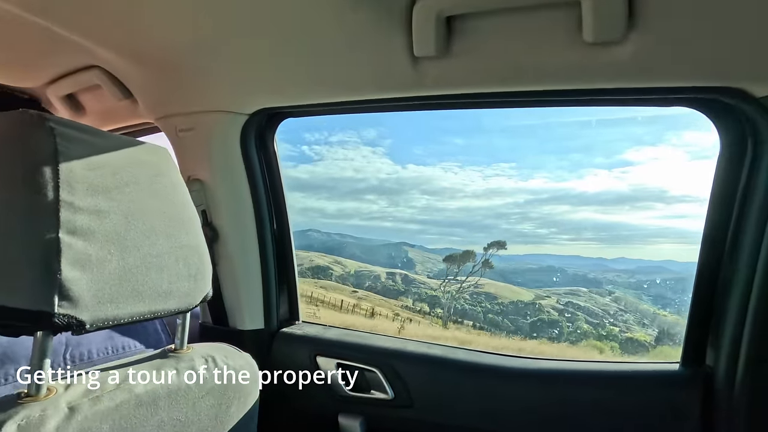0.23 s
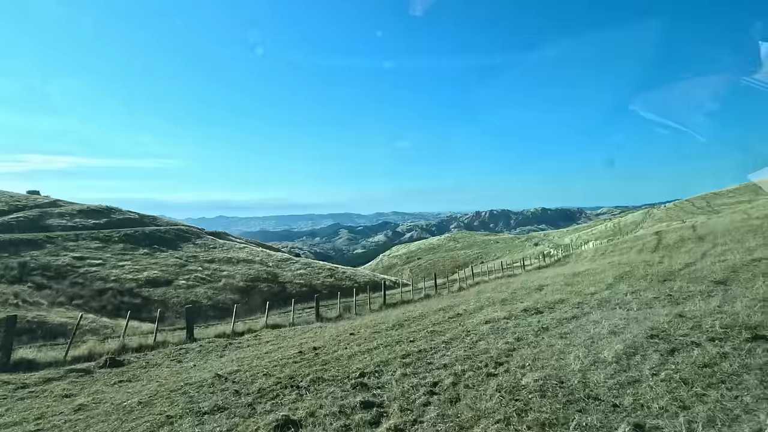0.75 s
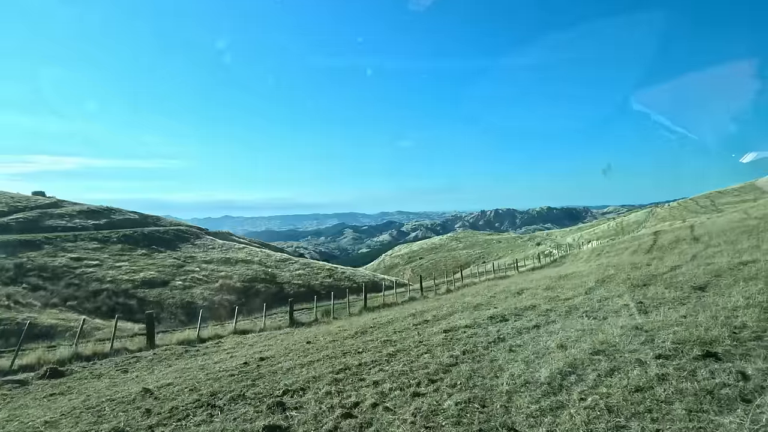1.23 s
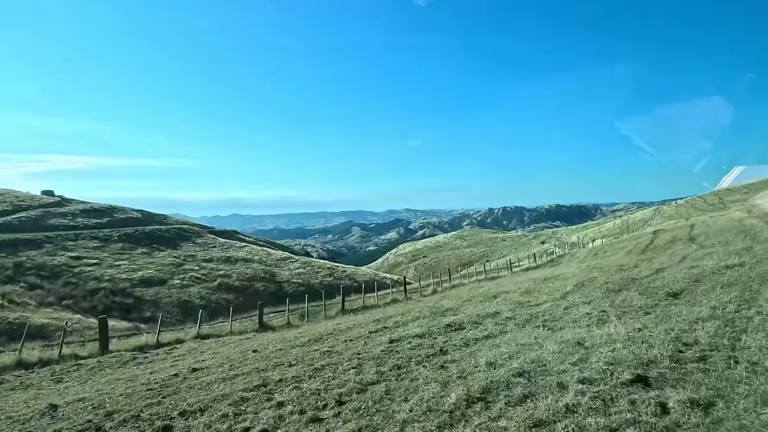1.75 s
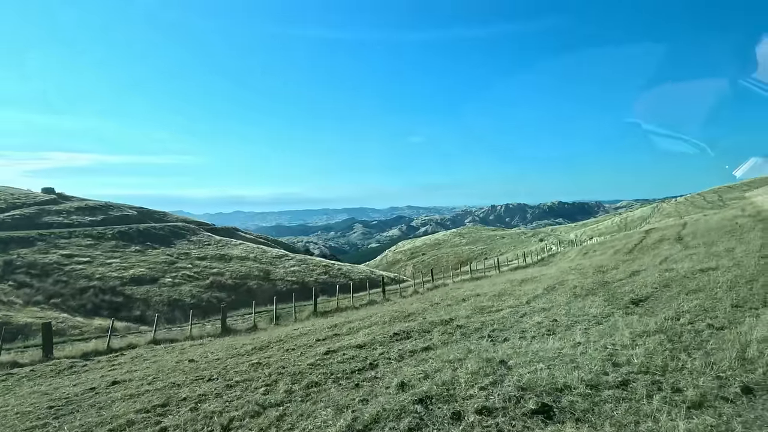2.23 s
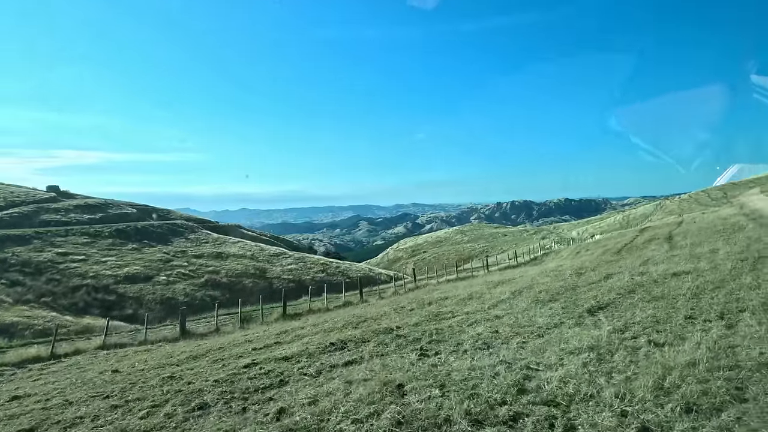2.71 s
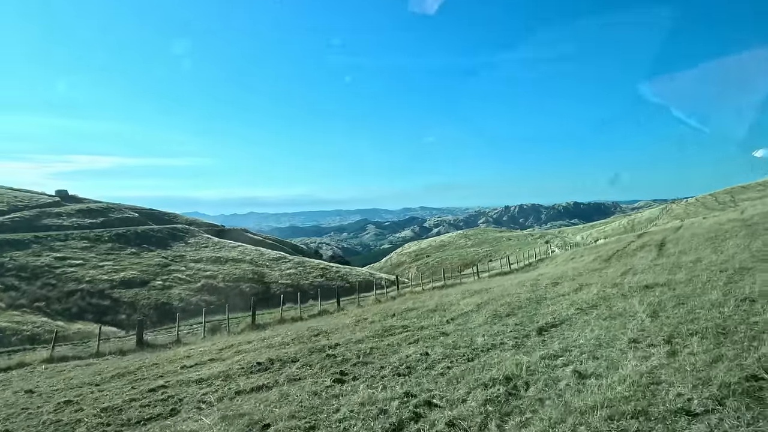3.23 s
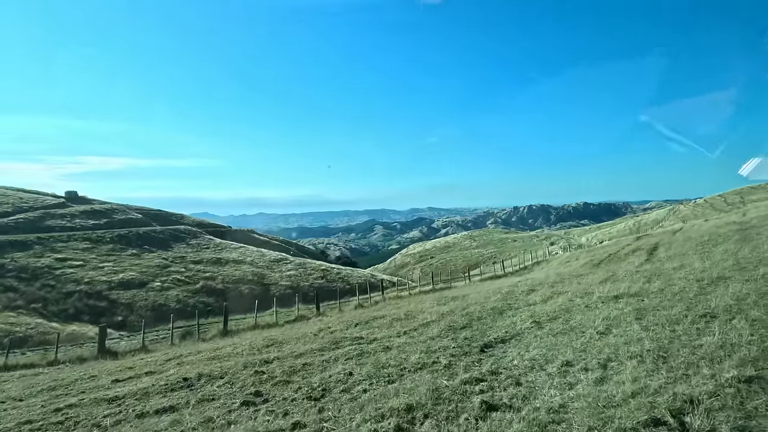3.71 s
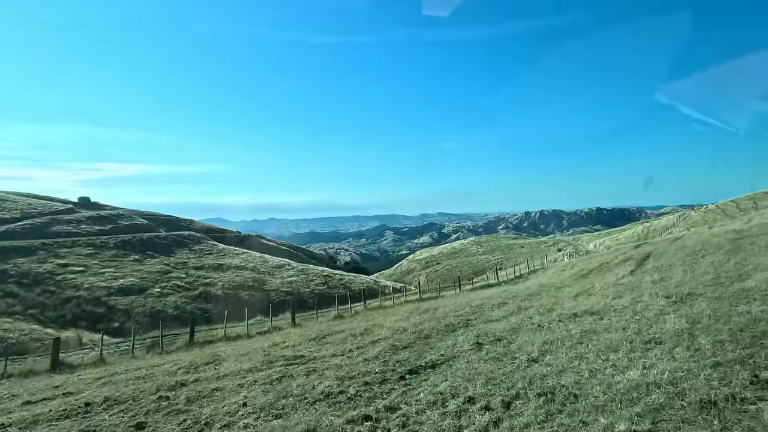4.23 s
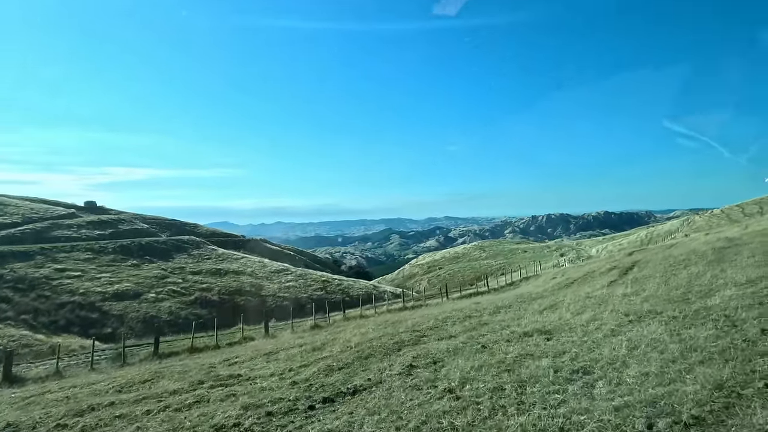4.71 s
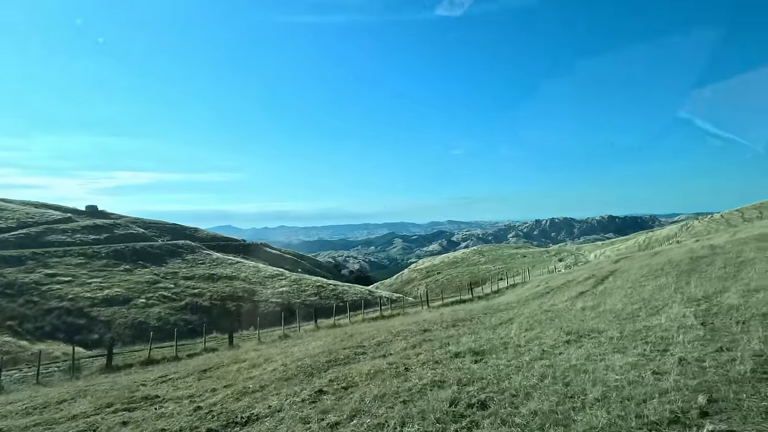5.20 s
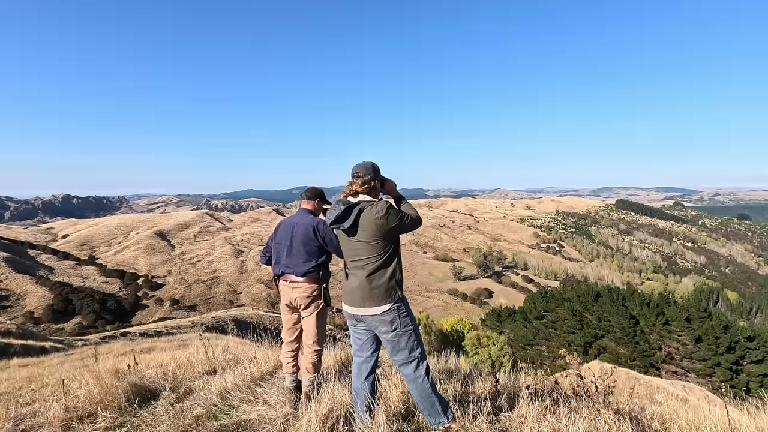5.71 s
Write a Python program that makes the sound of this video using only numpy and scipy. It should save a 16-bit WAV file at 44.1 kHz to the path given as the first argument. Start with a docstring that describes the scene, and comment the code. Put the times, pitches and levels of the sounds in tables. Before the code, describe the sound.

A deep, lumpy rumble of tyres and rocking bodywork fills a vehicle's cabin as it crosses grassy ground, the engine humming with small changes in speed. Scattered suspension thuds set off short knocks and rattles, with soft brushing and flicks of stems under the floor. The drive stops abruptly for a last half second outdoors: fading wind buffets on the microphone over a faint hiss of dry grass.

```python
"""A booming cabin and rumbling tyres, heard inside a four-cylinder utility vehicle on a rough paddock.
The rocking body pumps the cabin air; bumps thump the suspension and knock loose fittings; trim creaks.
The engine hums at multiples of crank speed, and dry grass brushes the underside.
At 5.46 s the scene changes to an open hilltop, where wind puffs on the microphone and dies down."""
import sys
import numpy as np
from scipy import signal
from scipy.fft import rfft, irfft, next_fast_len
from scipy.io import wavfile
from scipy.ndimage import uniform_filter1d, minimum_filter1d, map_coordinates

SR = 44100
rng = np.random.default_rng(int(sys.argv[2]) if len(sys.argv) > 2 else 0)


def store_wav(level_fs):
    """Save 16-bit WAV to argv[1]."""
    pcm = np.round(np.clip(np.atleast_2d(level_fs), -1, 1) * 32767)
    wavfile.write(sys.argv[1], SR, pcm.T.astype(np.int16))


N = 262826

# Boom of the rocking body: time_s, level_db
BOOM_LEVEL = [(0.05, -16.5), (1.13, -20), (1.21, -15), (1.85, -20), (2.24, -15), (2.46, -23), (2.59, -15),
              (3.22, -21), (3.46, -16), (3.64, -28.5), (3.77, -18), (4.4, -19.5), (4.61, -13),
              (4.71, -23.5), (5.01, -14.5), (5.16, -27.5), (5.34, -12), (5.45, -23.5)]
# Tussocks hitting the tyres: start_s, length_s, level_db, pitch_hz
TUSSOCK_HITS = [(0.07, 0.14, -25.5, 68), (0.116, 0.14, -16.5, 38), (0.225, 0.06, -29.5, 66),
                (.34, 0.11, -34, 116), (0.374, 0.13, -25, 70), (0.44, .14, -20, 44), (0.58, 0.15, -28, 68),
                (0.661, 0.083, -25, 78), (1.112, 0.088, -27.5, 55), (1.4, .1, -31, 47),
                (1.766, 0.058, -26, 60), (1.864, 0.092, -23.5, 62), (1.977, .1, -28.5, 66),
                (2.534, 0.074, -30.5, 72), (2.77, 0.14, -28, 62), (2.933, 0.11, -26, 62),
                (3.118, 0.12, -25.5, 64), (3.274, 0.075, -26.5, 62), (3.299, 0.082, -38, 150),
                (3.45, 0.12, -33.5, 100), (3.525, 0.15, -30, 54), (3.823, 0.12, -25.5, 64),
                (3.92, 0.15, -28.5, 66), (3.938, .1, -32.5, 108), (4.152, 0.12, -28, 58),
                (4.41, 0.14, -29.5, 55), (4.723, 0.12, -26.5, 58), (4.996, 0.1, -31, 100),
                (5.206, 0.11, -25, 60), (5.282, 0.078, -28.5, 104)]
# Suspension blows: start_s, level_db, pitch_ratio, bass_db, rebound_s, rebound_db
SUSPENSION_HITS = [(0.707, -25, 1, 8, 0.012, -26), (.948, -35, 1.22, -11, .02, -14),
                   (1.827, -28.5, 1.15, -3, 0.021, -9), (1.897, -16.5, 0.89, 2.5, .012, -4),
                   (2.009, -27.5, 1.07, -1, .017, -15), (2.802, -32.5, 0.99, -10, 0.0116, -16),
                   (2.868, -21, 0.96, -13, .011, -7.5), (3.603, -21, 0.98, -14, 0.019, -21),
                   (3.913, -21, 1.09, -12, .028, -5), (4.018, -20, 0.98, 0, 0.0121, -13),
                   (4.217, -34, .9, -6, 0.0135, -7), (5.244, -24, 1.11, -13, .03, -5),
                   (5.349, -20, 0.93, -3, .02, -13)]
# Loose fittings: start_s, level_db, pitch_ratio, chatter_s, chatter_db
FITTING_HITS = [(0.109, -41, 0.8, 0.022, -3.5), (0.312, -47.5, 0.88, 0.014, 1.5),
                (0.7073, -33, .8, 0.0054, -23), (1.8285, -30, 1.03, 0.016, -8),
                (1.898, -33.5, 1, 0.022, -2), (1.918, -40, 1.3, 0.011, -8), (2.07, -44.5, 1.4, 0.021, -2),
                (2.83, -41.5, 1, .025, 0), (2.873, -38, 1.2, 0.0083, -6), (2.884, -32.5, 1.09, 0.021, -4.5),
                (3.037, -32.5, 1, 0.014, -10), (3.7252, -22.5, 1.03, 0.034, -13.5),
                (4.019, -36.5, 1.1, 0.026, 0), (4.2, -43.5, 0.87, .012, 0), (4.432, -39, 1.1, 0.02, -6),
                (4.9997, -26, 1.02, 0.01, -13.5), (5.0225, -35.5, 1.13, 0.0078, -24),
                (5.349, -31, 0.83, 0.014, -6.5), (5.367, -38.5, 1.03, 0.0071, -8), (5.444, -44, 1, 0.02, 6)]
# Trim panel flurries: start_s, length_s, level_db
PANEL_FLURRIES = [(0.538, 0.015, -42), (0.617, 0.028, -40), (0.766, .005, -37)]
# Trim creaks: start_s, length_s, level_db, pitch_hz, rasp_hz
TRIM_CREAKS = [(3.163, 0.095, -61, 3160, 147), (3.415, 0.23, -65, 3520, 320), (3.903, 0.075, -64, 3440, 25),
               (3.993, 0.11, -66, 3530, 130), (4.07, 0.078, -63, 3440, 75), (4.31, .06, -67, 3450, 101),
               (4.39, 0.34, -68, 3560, 300), (4.961, 0.12, -58, 3480, 210), (5.105, 0.33, -66, 3490, 230),
               (5.412, 0.036, -55.5, 3440, 90)]
# Crankshaft speed: time_s, speed_hz
CRANK_SPEED = [(.15, 24.5), (.42, 22.5), (.72, 27.6), (.84, 28.2), (1.25, 24), (1.5, 23.8), (2.15, 27.4),
               (2.45, 25.8), (2.85, 24.8), (3.03, 26.6), (3.5, 25.2), (3.78, 26.2), (4.1, 26.8),
               (4.42, 29.9), (4.7, 28.6), (5, 30.5), (5.3, 31.3)]
# Engine hum: crank_multiple, level_db
ENGINE_ORDERS = [(2, -37), (4, -48), (5, -51), (6, -49), (7, -56), (9, -61), (11, -51.5), (15, -67),
                 (17, -65)]
# Engine load: time_s, hum_db
ENGINE_LOAD = [(.05, 6), (.64, -14.5), (.75, 0), (.92, -0.5), (1.05, -2), (1.7, -0.5), (2.25, -2.5),
               (2.6, -8), (2.95, -2), (3.3, -7), (3.75, -1.5), (4.05, -3.5), (4.3, -1), (4.75, -5),
               (5.1, -2), (5.45, -4.5)]
# Tufts brushing the underside: start_s, length_s, level_db
GRASS_TUFTS = [(0.411, 0.13, -61.5), (0.583, 0.046, -59.5), (0.787, 0.12, -62.5), (0.96, 0.014, -51),
               (1.037, 0.091, -64.5), (1.168, 0.041, -58), (1.345, 0.079, -56.5), (1.418, 0.068, -59.5),
               (1.634, 0.028, -60), (1.755, 0.337, -55), (1.765, .07, -56), (1.884, 0.09, -54.5),
               (1.977, 0.086, -48), (2.14, 0.14, -59.5), (2.379, 0.077, -55.5), (2.486, 0.061, -55.5),
               (2.61, 0.076, -51.5), (2.72, 0.19, -57), (3.067, 0.067, -55.5), (3.169, 0.076, -55),
               (3.351, 0.04, -58.5), (3.417, 0.23, -57.5), (3.669, 0.094, -56.5), (3.964, 0.098, -58),
               (4.154, 0.062, -62), (4.33, 0.027, -59), (4.445, 0.023, -52), (4.503, 0.059, -48.5),
               (4.582, 0.067, -52.5), (4.775, 0.15, -57.5), (4.935, 0.12, -61), (5.019, 0.049, -51),
               (5.164, 0.217, -59)]
# Stiff stems, plus the sharp pop of the bump at 0.71 s: start_s, level_db, snap_hz
STEM_FLICKS = [(.084, -52, 6030), (0.15, -50.5, 7050), (0.226, -57, 6000), (.248, -49, 4960),
               (.336, -52, 6000), (0.376, -51, 3500), (.709, -49, 2000), (0.839, -44.5, 3200),
               (.886, -49, 6000), (0.961, -48, 5000), (1.358, -39.5, 3400), (1.394, -40, 3200),
               (1.667, -43, 7000), (2.14, -43, 9000), (2.162, -42, 7000), (2.253, -47, 6500),
               (2.61, -45, 5000), (3.09, -49, 5000), (3.352, -39, 3700), (3.477, -42, 4000),
               (3.525, -45, 4500), (3.556, -41, 5000), (4.054, -43, 4000), (4.173, -46.5, 5000),
               (4.22, -43.5, 4500), (4.491, -45, 5000), (4.509, -41, 6000), (4.692, -51, 5000),
               (4.756, -44, 5000), (5.021, -41, 3600), (5.101, -50, 5000), (5.182, -46, 4000),
               (5.306, -44, 6000)]
# Hilltop wind: time_s, buffet_db, grass_db
WIND_LEVELS = [(5.45, -24.5, -54), (5.52, -26, -60), (5.57, -30, -55), (5.63, -25, -58.5),
               (5.7, -33.5, -61.5), (5.76, -39.5, -63.5), (5.81, -36.5, -66), (5.87, -29, -65.5),
               (5.96, -34.5, -64)]
# Eddies on the microphone: start_s, length_s, peak_db, edge_hz
WIND_PUFFS = [(5.476, 0.022, -19.5, 588), (5.5045, 0.0043, -19.5, 600), (5.485, 0.064, -18, 195),
              (5.511, 0.058, -28, 323), (5.585, 0.062, -23.5, 112), (5.606, 0.039, -20, 397),
              (5.608, 0.12, -25, 183), (5.654, 0.022, -30, 284), (5.689, 0.026, -29, 340),
              (5.894, 0.021, -38, 280)]

# Modes of struck parts: pitch_hz, level_db, t60_s
CHASSIS_MODES = [(80, 4, 0.067), (175.4, 1, 0.11), (244, -3.5, 0.072), (274, 6, 0.059), (306.6, -3, 0.069),
                 (365.5, -16, 0.14), (459, -14, 0.15)]
FITTING_MODES = [(422, 3.5, 0.053), (484, 15.5, 0.024), (621, 14, 0.015), (928, 5.5, 0.045),
                 (1001, 5, 0.067), (1112, -9.5, 0.055), (1320, -4.5, 0.097), (1534, -5.5, 0.076),
                 (1720, -12.5, 0.057)]
PANEL_MODES = [(673, -1, .03), (950, 1.5, 0.028), (1250, -0.5, 0.036), (1390, -5.5, 0.031)]

# Noise spectra: freq_hz, gain_db
TYRE_RUMBLE = [(20, -31.5), (29, 10), (36, 2.5), (44, -6), (68, -6.5), (80, -8.5), (112, -13), (135, -17),
               (170, -22.5), (220, -46.5), (400, -81), (1500, -120)]
TYRE_ROAR = [(90, -0.5), (150, -3), (185, 8.5), (215, -1), (250, 2.5), (310, 0), (390, -6.5), (480, -6),
             (560, -14.5), (780, -22.5), (1500, -56.5), (5000, -100)]
REAR_HOLLOW = [(300, -8), (500, -24.5), (620, -12.5), (685, -14), (712, -6), (740, -12), (830, -18.5),
               (1100, -24.5), (1600, -28), (2500, -31.5), (9000, -78.5)]
ENGINE_CLATTER = [(300, 2.5), (700, -14.5), (900, -3), (980, 2), (1050, -1), (1250, -2.5), (1550, -5.5),
                  (1900, -9.5), (3500, -14), (7000, -17.5), (11000, -30), (14000, -57.5)]
STALK_SWISH = [(600, -15.5), (1100, 0.5), (1760, -7.5), (2600, -5), (3500, -5), (4400, -8.5), (5500, -5.5),
               (7300, -7.5), (8400, -8.5), (10300, -9.5), (11500, -24.5), (14000, -52)]
SWIPE_EDGE = [(1500, -36), (3000, -5.5), (7500, 2.5), (10000, -21.5), (12000, -7), (14500, -27.5)]
FLOOR_SCRAPE = [(300, -37), (800, -8.5), (1300, -8), (2600, -10.5), (5000, -18), (11000, -43)]
REAR_RUSTLE = [(4000, -27), (9000, -4), (12000, -4), (14500, -20)]
WIND_BUFFET = [(15, -38.5), (30, 0), (70, -10.5), (120, -12), (170, -29.5), (300, -37), (600, -43),
               (1000, -53), (2000, -85.5)]
HILL_GRASS = [(400, -9.5), (900, -9), (1400, -5), (2200, -13.5), (3500, -15), (4400, -20), (6000, -25),
              (8400, -29), (10500, -33), (12000, -68), (14000, -95)]
# Stereo width: freq_hz, side_gain_db
STEREO_WIDTH = [(60, -56), (125, -62), (250, -21.5), (500, -14), (1000, -8.5), (2000, -6), (4000, -5.5),
                (8000, -10), (12000, -9)]


def cabin_boom(resonance_hz=21, drift_hz=2.24):
    """The shaken body pumps the cabin air at its lowest resonance."""
    pitch_hz = resonance_hz + drift_hz * wobble(6.6)
    level_db = curves(BOOM_LEVEL)[0] + 1 + wobble(26)
    return amp(level_db) * unit(sine(pitch_hz))


def tussocks(wander_ratio=0.11):
    """Each tussock sets the cabin booming for a few uneven cycles."""
    track = np.zeros(N)
    for start_s, length_s, level_db, pitch_hz in TUSSOCK_HITS:
        boom = unit(sine(pitch_hz * (1 + wander_ratio * wobble(pitch_hz / 2))))
        track += amp(level_db - 1) * swell(start_s, length_s) * boom
    return track


def tyres(rumble_db=-31, roar_db=-44, hollow_db=-52):
    """Lumpy rolling noise: jolts swell it, roar grows with speed; the rear seat is boomy and hollow."""
    lumps, rear, shake = wobble(20), in_rear(), jolts()
    rumble = amp(rumble_db + 3 * rear + 4.5 * shake + 3 * lumps) * noise(TYRE_RUMBLE)
    roar = amp(roar_db - 5 * rear + 3 * shake + speed_db() + 2.03 * lumps) * noise(TYRE_ROAR)
    return rumble + roar + amp(hollow_db) * rear * noise(REAR_HOLLOW)


def suspension_thumps(bass_below_hz=205):
    """The suspension strikes the chassis and rebounds once; where it lands sets pitch and bass."""
    track = np.zeros((2, N))
    for start_s, level_db, pitch_ratio, bass_db, rebound_s, rebound_db in SUSPENSION_HITS:
        modes = [(hz, db + bass_db, t60_s) if hz < bass_below_hz else (hz * pitch_ratio, db, t60_s)
                 for hz, db, t60_s in CHASSIS_MODES]
        for delay_s, loss_db in [(0, 0), (rebound_s, rebound_db)]:
            blow = strike(modes, crack_db=-0.5, crack_t60_s=0.05, attack_s=0.0042)
            add(track, start_s + delay_s, amp(level_db + loss_db) * blow)
    return track


def fitting_knocks(rattle_db=-5, bounces=5):
    """Loose fittings strike once, then chatter. Harder blows are sharper."""
    track = np.zeros((2, N))
    for start_s, level_db, pitch_ratio, chatter_s, chatter_db in FITTING_HITS:
        modes = [(hz * pitch_ratio, db, t60_s) for hz, db, t60_s in FITTING_MODES]
        attack_s = np.interp(level_db, [-33, -23], [0.0015, 0.0006])
        blow = strike(modes, crack_db=9.5, crack_t60_s=0.073, attack_s=attack_s)
        add(track, start_s, amp(level_db) * blow)
        for delay_s in chatter_s * (np.arange(bounces) + rng.uniform(0.3, 1, bounces)) / bounces:
            bounce = strike(modes, crack_db=19, crack_t60_s=0.053, attack_s=0.00097)
            add(track, start_s + delay_s, amp(level_db + chatter_db + rattle_db) * bounce)
    return track


def panel_clacks(gap_s=0.005, fade_db=5):
    """A plastic panel chatters against its clips, weakening through each flurry."""
    track = np.zeros((2, N))
    for start_s, length_s, level_db in PANEL_FLURRIES:
        for delay_s in np.arange(0, length_s, gap_s):
            contact_s = start_s + delay_s + gap_s * rng.random() / 2
            clack = strike(PANEL_MODES, crack_db=5, crack_t60_s=0.022, attack_s=0.00087, clack_db=-5)
            add(track, contact_s, amp(level_db - 2 - fade_db * delay_s / length_s) * clack)
    return track


def bumps(side_gain=0.7):
    """Thumps, knocks and clacks, slightly to the left."""
    mid_side = suspension_thumps() + fitting_knocks() + panel_clacks()
    return spread(mid_side * [[1], [side_gain]]) * pan(left_db=0.94)


def engine(drone_hz=175, drone_half_width_hz=14, drone_db=8, waver_db=2.8, clatter_db=-58):
    """Crank orders hum with load and drone at a cabin resonance; clatter pulses at each firing."""
    crank_hz = curves(CRANK_SPEED)[0]
    crank_rad = 2 * np.pi * np.cumsum(crank_hz * (1 + 0.005 * wobble(15))) / SR
    hum = np.zeros(N)
    for order, level_db in ENGINE_ORDERS:
        lift_db = drone_db / (1 + ((order * crank_hz - drone_hz) / drone_half_width_hz) ** 2)
        gain = amp(level_db + lift_db + waver_db * wobble(9))
        hum += gain * unit(np.sin(order * crank_rad + rng.uniform(0, 2 * np.pi)))
    firing = 1 + 0.31 * np.cos(2 * crank_rad)  # two firings a turn
    clatter = noise(ENGINE_CLATTER, firing) * pan(left_db=1.4)
    clatter_gain = amp(clatter_db - 3 * in_rear() + 0.99 * speed_db())
    return amp(curves(ENGINE_LOAD)[0]) * hum + clatter_gain * clatter


def grass(edge_db=-57, scrape_db=-53):
    """Short turf whispers throughout; tall tufts swish under the floor as crowds of stalk ticks."""
    turf = amp(-66 - 11 * in_rear() + 2.6 * speed_db() + 3.5 * wobble(20))
    tuft_power = sum((amp(level_db) * tuft_contact(start_s, length_s)) ** 2
                     for start_s, length_s, level_db in GRASS_TUFTS)
    contact = np.sqrt(turf ** 2 + tuft_power)
    ticks = amp(0.5 * wobble(900) + 1.5 * wobble(70))
    swish = amp(-4.5) * contact * (noise(STALK_SWISH, ticks) + amp(-1) * stalk_crackle())
    edge = amp(edge_db) * (contact / contact.max()) ** 0.94 * noise(SWIPE_EDGE, ticks)
    press = contact * np.sqrt(jolts())  # the body sinks on its springs and the floor pan scrapes
    scrape = amp(scrape_db) * (press / press.max()) ** 0.73 * noise(FLOOR_SCRAPE, ticks)
    rustle = amp(-15) * contact * in_rear() * noise(REAR_RUSTLE, ticks)
    return swish + edge + scrape + rustle


def tuft_contact(start_s, length_s, ramp_s=0.036, arch_db=3):
    """A tuft bends against the floor, presses hardest halfway and springs free."""
    age_s = clock() - start_s
    touch = np.clip(np.minimum(age_s, length_s - age_s) / ramp_s + 0.5, 0, 1)
    return touch * amp(arch_db * (swell(start_s, length_s) - 1))


def stalk_crackle(count=5000, centre_hz=5600, spread_oct=0.42, decay_cycles=1.6, scatter_db=4.6):
    """Dry stalks crack under the tyres, each with its own pitch, size and side; rms 1."""
    onset, chance, side = rng.random((3, count, 1))
    pitch_hz = np.minimum(centre_hz * 2 ** (spread_oct * rng.standard_normal((count, 1))), SR / 4)
    offsets = np.arange(SR // 200)
    cycles = pitch_hz * offsets / SR
    size = amp(-scatter_db * np.log(chance + 1 / 50))
    cracks = size * np.exp(-cycles / decay_cycles) * np.sin(2 * np.pi * cycles)
    indices = ((onset * (N - len(offsets))).astype(int) + offsets).ravel()
    weights = 1, np.sqrt(2) * np.cos(np.pi * side)
    mid_side = np.array([np.bincount(indices, (cracks * weight).ravel(), N) for weight in weights])
    return unit(spread(shaped(mid_side, STALK_SWISH)))


def stem_flicks(t60_s=0.048):
    """Stiff stems flick the underside, each with a one-octave snap at its own pitch; the bump at 0.71 s pops
    the same way."""
    track, age_s = np.zeros((2, N)), np.arange(SR // 16) / SR
    for start_s, level_db, snap_hz in STEM_FLICKS:
        flick = burst(level_db - 3, t60_s, 1000, 12000, age_s) / 2
        snap = burst(level_db + 1, t60_s, snap_hz / np.sqrt(2), snap_hz * np.sqrt(2), age_s)
        add(track, start_s, flick + snap)
    return spread(shaped(track, STALK_SWISH))


def trim_creaks():
    """Trim rubs with a thin note, clear or raspy, as the body twists."""
    rasp, drift_hz = wobble(700), 12 * wobble(17)
    flutter = unit(amp(2.5 * wobble(200)))
    notes = sum(amp(level_db) * swell(start_s, length_s) * sine(pitch_hz + rasp_hz * rasp + drift_hz)
                for start_s, length_s, level_db, pitch_hz, rasp_hz in TRIM_CREAKS)
    return np.sqrt(2) * flutter * notes


def hilltop_wind():
    """Eddies hit the microphone, the faster ones brighter, over a hiss of dry grass."""
    buffet_db, grass_db = curves(WIND_LEVELS)
    air = amp(buffet_db) * noise(WIND_BUFFET) + amp(grass_db) * noise(HILL_GRASS)
    for start_s, length_s, peak_db, edge_hz in WIND_PUFFS:
        spectrum = [(20, -15), (60, 0), (edge_hz, -4), (2 * edge_hz, -32), (8 * edge_hz, -110)]
        eddy = noise(spectrum, swell(start_s, length_s))
        air += amp(peak_db) * eddy / np.abs(eddy).max()
    return air


def speed_db(cruise_hz=27):
    """Road speed in a fixed gear, relative to cruise."""
    return 20 * np.log10(curves(CRANK_SPEED)[0] / cruise_hz)


def in_rear(move_at_s=0.726, move_s=0.15):
    """Microphone position: 1 on the rear seat, then 0 at the windscreen."""
    return np.clip((move_at_s - clock()) / move_s + 0.5, 0, 1)


def jolts(rise_s=0.032, settle_s=0.22):
    """Body shake: each thump builds it up, then it settles; the hardest adds about 1."""
    hardest_db = max(row[1] for row in SUSPENSION_HITS)
    shake = np.zeros(N)
    for start_s, level_db, *_ in SUSPENSION_HITS:
        age_s = clock() - start_s
        rise = np.clip(age_s / rise_s + 0.5, 0, 1)
        shake += amp(level_db - hardest_db) * rise * np.exp(-np.abs(age_s) / settle_s)
    return shake


def strike(modes, crack_db, crack_t60_s, attack_s, clack_db=13):
    """Ringing modes plus contact noise, mid/side, peak about 1; a slower attack is duller."""
    age_s = np.arange(SR // 4) / SR
    pitch_hz, level_db, t60_s = np.transpose(modes)[:, :, None]
    size, detune, phase = rng.standard_normal((3, 2, len(modes), 1))
    phase[0] = 0  # the direct blow starts all modes together; reflections arrive at random
    decay = amp(level_db + 2 * size - 60 * age_s / t60_s)
    tones = decay * np.sin(2 * np.pi * (pitch_hz * (1 + 0.017 * detune) * age_s + phase))
    crack = burst(crack_db, crack_t60_s, 370, 1300, age_s)
    clack = burst(clack_db, 0.014, 1500, 4500, age_s)
    onset = 1 - np.exp(-age_s / attack_s)
    lowpass = signal.butter(4, min(2.3 / attack_s, SR / 4), fs=SR, output="sos")
    blow = signal.sosfilt(lowpass, (tones.sum(axis=1) + crack + clack) * onset)
    return blow / (2.6 * blow[:, :SR // 100].std(axis=1, keepdims=True))


def burst(level_db, t60_s, low_hz, high_hz, age_s):
    """Two decaying band-limited noises."""
    band = signal.butter(2, [low_hz, high_hz], "bandpass", fs=SR, output="sos")
    decay = amp(level_db - 60 * age_s / t60_s)
    return signal.sosfilt(band, decay * rng.standard_normal((2, len(age_s))))


def noise(spectrum, envelope=1):
    """Stereo noise, enveloped before filtering; rms 1."""
    return unit(spread(shaped(envelope * rng.standard_normal((2, N)), spectrum)))


def spread(mid_side):
    """Mid/side to left/right: mono bass, wider treble."""
    mid, side = mid_side[0], shaped(mid_side[1], STEREO_WIDTH)
    return np.array([mid + side, mid - side])


def shaped(x, spectrum):
    """Filter by (freq_hz, gain_db) points on a log axis."""
    freq_hz, gain_db = np.transpose(spectrum)
    return filtered(x, lambda hz: amp(np.interp(np.log(hz + 1), np.log(freq_hz + 1), gain_db)))


def filtered(x, response):
    """Filter by a gain function of frequency."""
    size = next_fast_len(N + SR // 2)
    return irfft(rfft(x, size) * response(np.fft.rfftfreq(size, 1 / SR)), size)[..., :N]


def add(track, start_s, sound):
    """Mix sound into track."""
    part = track[:, max(round(start_s * SR), 0):][:, :sound.shape[1]]
    part += sound[:, :part.shape[1]]


def swell(start_s, length_s):
    """Half-sine envelope."""
    return np.sin(np.pi * np.clip((clock() - start_s) / max(length_s, 0.005), 0, 1))


def wobble(rate_hz):
    """Smooth random curve through rate_hz knots a second."""
    return map_coordinates(rng.standard_normal(int(N * rate_hz / SR) + 4), [clock() * rate_hz])


def curves(rows):
    """Each column after time_s, interpolated per sample."""
    time_s, *columns = np.transpose(rows)
    return [np.interp(clock(), time_s, column) for column in columns]


def sine(pitch_hz):
    """Sine following a per-sample pitch."""
    return np.sin(2 * np.pi * np.cumsum(pitch_hz) / SR)


def pan(left_db):
    """Equal and opposite channel levels, as gains."""
    return amp([[left_db], [-left_db]])


def amp(db):
    """Decibels to gain."""
    return 10 ** (np.asarray(db) / 20)


def unit(x):
    """Scale to rms 1."""
    return x / np.sqrt(np.mean(x ** 2) + 1e-20)


def clock():
    """Sample times in seconds."""
    return np.arange(N) / SR


def scene(hilltop_at_s=5.462, fade_s=0.016):
    """The drive, then a quick crossfade to the hilltop."""
    outside = np.clip((clock() - hilltop_at_s) / fade_s + 0.5, 0, 1)
    drive = (cabin_boom() + tussocks() + tyres() + engine()
             + grass() + stem_flicks() + bumps() + trim_creaks())
    return (1 - outside) * drive * pan(left_db=-0.25) + outside * hilltop_wind()


def record(dry, ceiling=0.38, top_hz=15000):
    """A limiter holds down the bass swings; everything above top_hz is cut."""
    needed_gain = ceiling / np.maximum(np.abs(dry).max(axis=0), ceiling)
    held_gain = minimum_filter1d(needed_gain, size=SR // 30)
    gain = uniform_filter1d(held_gain, size=SR // 50)
    return filtered(dry * gain, lambda hz: hz < top_hz)


dry = scene()
out = record(dry)
store_wav(out)
```